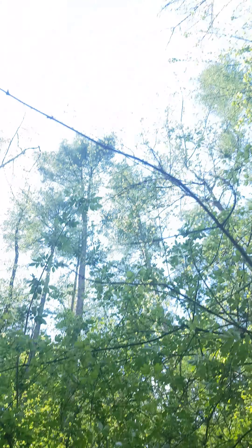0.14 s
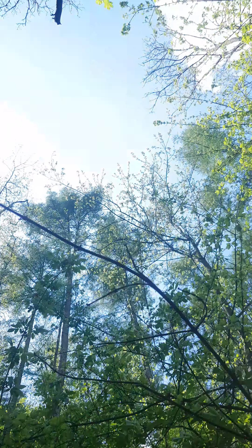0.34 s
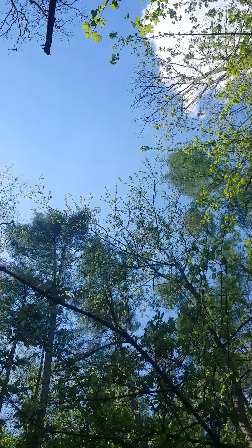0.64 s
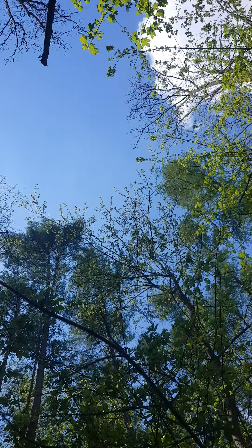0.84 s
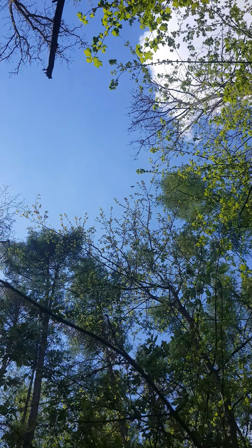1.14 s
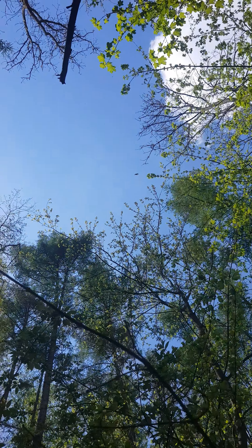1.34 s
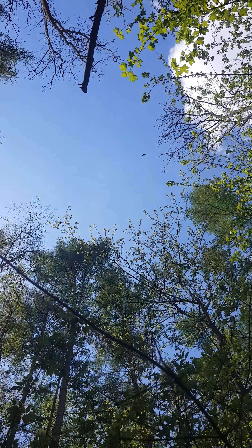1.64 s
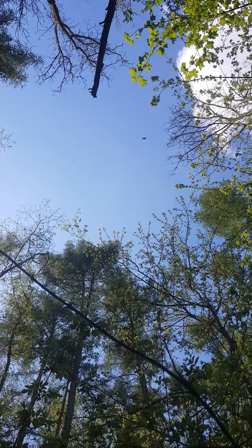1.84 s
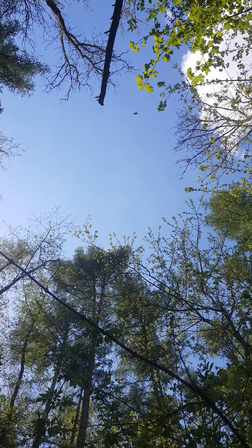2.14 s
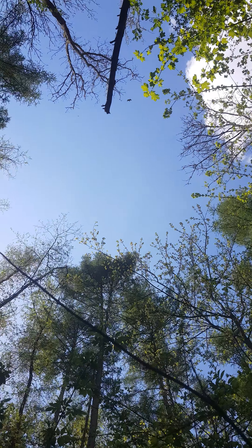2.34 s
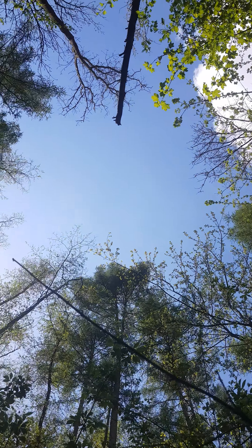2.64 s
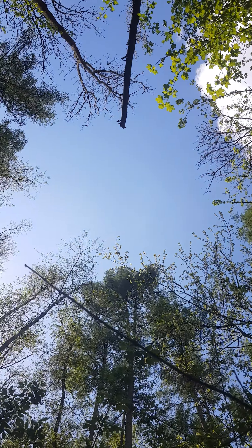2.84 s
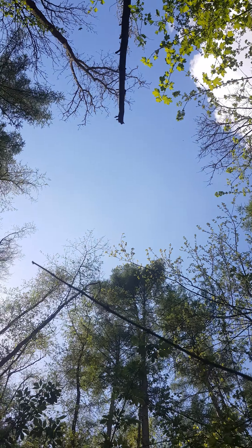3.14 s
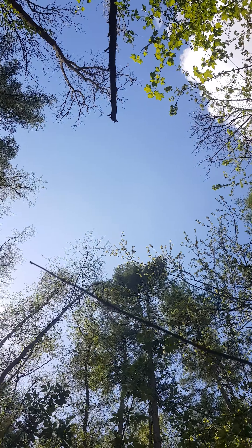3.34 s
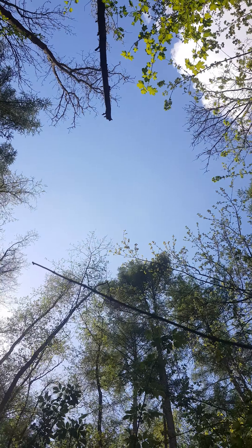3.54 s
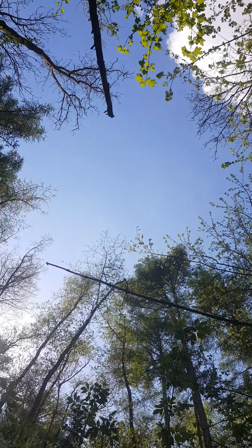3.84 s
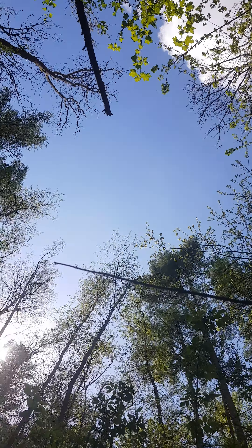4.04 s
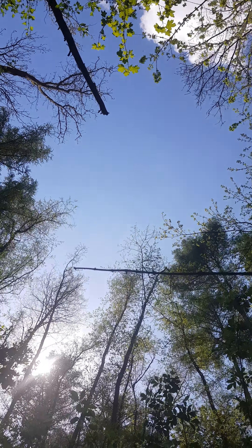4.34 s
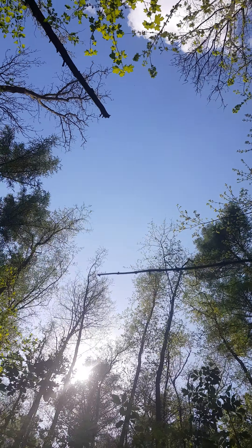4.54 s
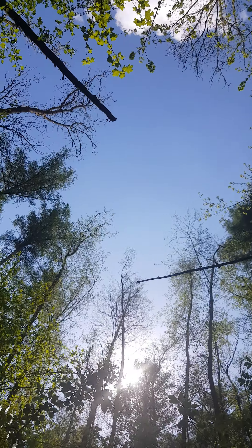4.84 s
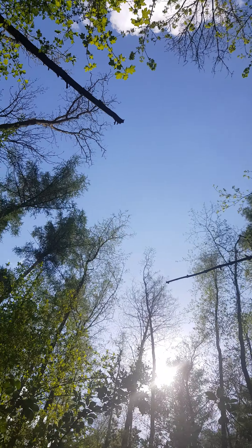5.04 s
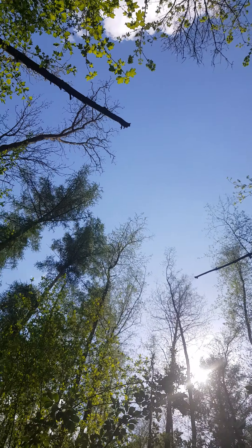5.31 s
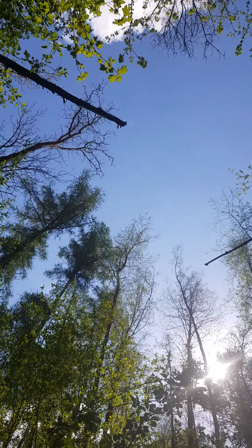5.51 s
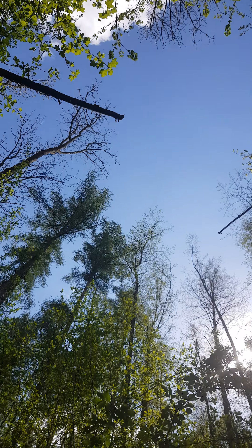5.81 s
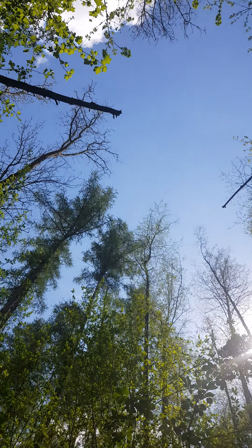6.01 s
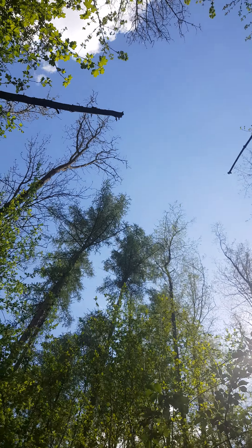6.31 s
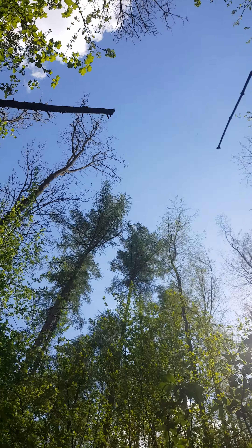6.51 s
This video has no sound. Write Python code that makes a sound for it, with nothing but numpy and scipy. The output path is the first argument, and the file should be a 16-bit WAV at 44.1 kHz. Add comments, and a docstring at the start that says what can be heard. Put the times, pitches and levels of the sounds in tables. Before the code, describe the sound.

A soft low bump and cloth rustle open the scene, then distant birds of prey cry overhead, plaintive and falling, slightly left, with diffuse forest echo. A far songbird sings a quick run of whistled and buzzy notes between the cries. Wind rumbles unevenly on the handheld microphone, and light ticks and sleeve strokes gather towards the end over a quiet hush.

```python
"""A woodland clearing: buzzards mew high overhead, and the trees echo them.
Each cry is a harmonic voice whose pitch arches up and slides down; rasps are narrow noise bands.
A far songbird sings tone sweeps, mostly echo. A sleeve rustles and ticks on the hand-held camera
(shaped noise), which jolts softly (short low tones). Air rumbles on the microphone over the hush
of the wood: two coloured noises."""
import sys
import numpy as np
from scipy import signal
from scipy.fft import rfft, irfft, next_fast_len
from scipy.io import wavfile
from scipy.ndimage import map_coordinates

SR = 44100
rng = np.random.default_rng(int(sys.argv[2]) if len(sys.argv) > 2 else 0)


def waveform_to_disk(signal):
    """Save audio, clipped to [-1, 1], as 16-bit WAV at the path in sys.argv[1]."""
    frames = np.transpose(np.atleast_2d(signal))
    scaled = np.clip(frames, -1, 1) * 32767
    samples = np.round(scaled).astype(np.int16)
    wavfile.write(sys.argv[1], SR, samples)


N = 293962
TIME = np.arange(N) / SR


def amp(db):
    """Decibels to gain."""
    return 10 ** (np.asarray(db) / 20)


def unit(x):
    """x at rms 1."""
    return x / np.sqrt(np.mean(np.abs(x) ** 2) + 1e-20)


def along(points, hz):
    """(frequency [Hz], value) points read on a log frequency axis."""
    f, v = np.transpose(points)
    return np.interp(np.log(hz + 1), np.log(f + 1), v)


def curve(points):
    """(time [s], value) points read at every sample."""
    s, v = np.transpose(points)
    return np.interp(TIME, s, v)


def wobble(rate_hz, size=N):
    """Smooth random curve, rate_hz knots per second."""
    knots = rng.standard_normal(int(size * rate_hz / SR) + 4)
    return map_coordinates(knots, [np.arange(size) * rate_hz / SR])


def filtered(x, response):
    """x times a zero-phase gain response(hz)."""
    m = next_fast_len(N + 8192)
    gain = response(np.fft.rfftfreq(m, 1 / SR))
    return irfft(rfft(x, m) * gain, m)[..., :N]


def add(track, s, sound):
    """Mix a sound into a track from time s on."""
    start = max(round(s * SR), 0)
    part = sound[..., :N - start]
    track[..., start:start + part.shape[-1]] += part


def panned(db):
    """Left and right gains for a level difference."""
    return amp([[db / 2], [-db / 2]])


def rush(spectrum, alike):
    """Stereo noise, rms 1, of given colour and left-right correlation."""
    def response(hz):
        turn = np.arccos(np.clip(along(alike, hz), -1, 1)) / 2
        return amp(along(spectrum, hz)) * [np.cos(turn), np.sin(turn)]

    mid, side = filtered(rng.standard_normal((2, N)), response)
    return unit(np.array([mid + side, mid - side]))


# buzzard cries; pitches are of the loud second harmonic:
# (time [s], length [s], start [Hz], crest [Hz], settling pitch [Hz], rise [s], slide [s], swell [s],
#  peak level [dB], fade [dB/s], overtones [dB], hoarseness [dB], echo send [dB], left-right [dB],
#  left lead [s])
CRIES = [(0.484, .55, 2150, 2398, 1860, 0.063, 0.1, 0.016, -58.5, 35, -23, -10, -1.5, -7, .00038),
         (0.889, 0.26, 2850, 2783, 1888, 0.011, 0.13, 0.14, -64.5, 48, -30, -12, 1.5, -5, 0.00042),
         (1.583, 0.16, 2204, 2772, 1876, .069, 0.099, 0.0041, -46, 45, -12.5, -19, -5.5, -3, 0.000065),
         (1.624, 0.51, 1830, 2311, 1775, 0.094, 0.14, 0.16, -37, 80, -25, -29, -14.5, -2.5, 0.000088),
         (1.957, .23, 2480, 2485, 1815, .01, .145, 0.097, -55.5, 37, -26, -5.5, -7, -4, .00009),
         (2.51, 0.59, 2030, 2442, 1830, 0.041, .11, 0.025, -53, 37, -21.5, -16, -5.5, -6.5, 0.00044),
         (2.802, 0.35, 2894, 2840, 2034, .115, .068, 0.22, -58.5, 51, -35, -12, -10, -2, 0.00047),
         (4.01, 0.24, 2162, 2416, 1840, 0.045, 0.083, 0.023, -53, 73, -22, -15, -1.5, -5.5, .00046),
         (4.257, 0.27, 2746, 2780, 1888, 0.0087, 0.084, 0.069, -62, -8, -28, -13, 0, -2, 0.00047),
         (4.369, .16, 2830, 2920, 1920, 0.012, 0.18, 0.044, -68, 25, -18, -25, -11, -3, 0.0004),
         (4.475, 0.54, 1930, 2255, 1814, .075, .124, 0.054, -43.5, 43.5, -21, -27, -9.5, -5.5, 0.00014),
         (5.427, 0.31, 2380, 2600, 1683, 0.053, .11, 0.12, -61.5, 36, -25, -7, 0.5, -4, 0.00029),
         (5.49, 0.17, 2232, 2390, 2204, 0.055, .06, .05, -58, 78, -33, -12, -13, -5.5, 0.00033),
         (5.727, 0.26, 2740, 2740, 1945, 0.00515, .093, 0.085, -66.5, 40, -37, -11, 2, -7, 0.00032)]
# harsh rasps: (time [s], length [s], centre [Hz], width as standard deviation [Hz], level [dB])
RASP_BANDS = [(.5, 0.15, 2590, 180, -63.5), (2.54, 0.11, 2630, 160, -58.5), (4.05, 0.074, 2710, 150, -62.5),
              (4.01, 0.19, 3350, 280, -65.5), (4.04, 0.17, 3680, 100, -65.5)]
GROUND_S, GROUND_DB = 0.0105, -16.5


def buzzards(slap_s=0.075, slap_db=-11):
    """Cries reach the left port first; cries and rasps then return from ground and trees."""
    direct, sent = np.zeros((2, N)), np.zeros(N)
    for (s, length_s, start_hz, crest_hz, settle_hz, rise_s, slide_s, swell_s, peak_db, fade_db_per_s,
         overtone_db, hoarse_db, echo_db, side_db, lead_s) in CRIES:
        t = np.arange(int(length_s * SR)) / SR
        glide_hz = mew_pitch(t, start_hz, crest_hz, settle_hz, rise_s, slide_s)
        level_db = mew_level(t, swell_s, peak_db, fade_db_per_s)
        cry = mew(t, glide_hz, level_db, overtone_db, hoarse_db)
        left, right = cry * panned(side_db)
        add(direct[0], s, left)
        add(direct[1], s + lead_s, right)
        add(sent, s, cry * amp(echo_db))
    for s, length_s, centre_hz, width_hz, db in RASP_BANDS:
        swell = signal.windows.tukey(int(length_s * SR), 0.7)
        band = lambda hz: np.exp(-((hz - centre_hz) / width_hz) ** 2 / 2)
        harsh = unit(filtered(rng.standard_normal(N), band))
        rasp = amp(db) * swell * harsh[:len(swell)]
        add(direct, s, rasp)
        add(sent, s, rasp)
    # ground bounce beats against each glide and cuts dips into it
    add(direct, GROUND_S, amp(GROUND_DB) * direct)
    direct += near_trunks(direct, db=-6.5, reach_s=0.03)
    # foliage dulls the overtones; the clearing's edge gives one distinct return
    foliage_db = [(2500, 2.5), (3200, -0.5), (5000, -1)]
    sent = filtered(sent, lambda hz: amp(along(foliage_db, hz)))
    add(direct, slap_s, amp(slap_db) * sent)
    return direct + woodland(sent, build_up_s=0.0085) * panned(-0.26)


DROOP_SHARE, DROOP_S = 0.07, 0.026


def mew_pitch(t, start_hz, crest_hz, settle_hz, rise_s, slide_s):
    """Pitch scoops to a crest, slides towards a settling pitch and droops at the very end."""
    scoop = (crest_hz - start_hz) * np.maximum(1 - t / rise_s, 0) ** 2
    after_crest = np.maximum(t - rise_s, 0) / slide_s
    slide = (crest_hz - settle_hz) * (1 - 1 / (1 + after_crest ** 2))
    droop = 1 - DROOP_SHARE * np.exp((t - t[-1]) / DROOP_S)
    return (crest_hz - scoop - slide) * droop


SWELL_DB = 16.5  # a cry starts this far under its peak


def mew_level(t, swell_s, peak_db, fade_db_per_s):
    """Level swells to a peak, then changes steadily (a negative fade grows)."""
    swell_db = SWELL_DB * np.maximum(1 - t / swell_s, 0) ** 2
    return peak_db - swell_db - fade_db_per_s * np.maximum(t - swell_s, 0)


# overtone colour: (frequency [Hz], gain [dB])
THROAT_COLOUR = [(900, -9), (1400, 3), (2200, -17), (3300, 3), (3800, -10.5), (4200, -0.5), (4650, -9),
                 (5050, -7), (5500, -13), (7000, -31)]
SHRILL_DB = 4  # top partials against the lower overtones


def mew(t, hz, db, overtone_db, hoarse_db, waver=0.0034, flutter_db=2.5, edge_s=0.0049, shrill_s=0.255,
        shrill_width_s=0.075, bloom_s=0.023, rough_rad=0.15, shimmer_db=3):
    """One cry: harmonic voice whose second partial carries nearly all the power."""
    size = len(t)
    pitch_hz = hz / 2 * (1 + waver * wobble(90, size))
    phase = 2 * np.pi * np.cumsum(pitch_hz) / SR
    # partials 4 and 5 open around shrill_s into the cry
    shrill = amp(SHRILL_DB) * (0.055 + np.exp(-((t - shrill_s) / shrill_width_s) ** 2))
    # overtones bloom after the attack, with jitter of their own
    bloom = 1 - np.exp(-(t / bloom_s) ** 2)
    jitter = rough_rad * wobble(350, size)
    voice = np.sin(2 * phase)
    for k, opening in ((1, 1), (3, 1), (4, shrill), (5, shrill)):
        partial_db = overtone_db + along(THROAT_COLOUR, k * pitch_hz) + shimmer_db * wobble(80, size)
        voice += bloom * opening * amp(partial_db) * np.sin(k * (phase + jitter))
    # uneven vibration spreads a hoarse skirt around the line
    skirt = wobble(600, size) * np.sin(2 * phase) + wobble(600, size) * np.cos(2 * phase)
    voice += amp(hoarse_db) * skirt
    gate = np.clip(np.minimum(t, t[-1] - t) / edge_s, 0, 1)
    # turbulent air makes the far voice flutter
    return np.sqrt(2) * voice * gate * amp(db + flutter_db * wobble(107.9, size))


def near_trunks(pair, db, reach_s, count=8):
    """Weak early returns, different at each port, beat against a gliding tone."""
    returns = np.zeros((2, N))
    for port, x in zip(returns, pair):
        for delay_s in rng.uniform(0.0044, reach_s, count):
            add(port, delay_s, amp(db) / np.sqrt(count) * x)
    return returns


# echo of the wood: (frequency [Hz], time to decay 60 dB [s])
TREE_T60 = [(300, 0.92), (2200, 1.48), (4500, 0.42), (10000, 0.6)]


def woodland(x, build_up_s):
    """Trunks and crowns scatter a sound into a diffuse tail that takes a moment to build."""
    hz, t, z = signal.stft(rng.standard_normal((2, SR)), SR, nperseg=256)
    decay = amp(-60 * t / along(TREE_T60, hz)[:, None])
    shape = decay * (1 - np.exp(-t / build_up_s))
    # equal tail energy in every band; 128 = hop in samples
    shape /= np.sqrt(np.sum(shape ** 2, axis=1, keepdims=True) * 128)
    tail = signal.istft(z * shape, SR, nperseg=256)[1]
    return signal.fftconvolve(x[None], tail, axes=1)[:, :N]


# repeated notes: (first time [s], notes [count], spacing [s], length [s], start [Hz], end [Hz],
#  level of the last before direct and echo gains [dB], buzz [share of pitch], crescendo [dB/note])
NOTE_RUNS = [(2.41, 4, 0.17, .028, 4520, 4280, -67.5, .014, 3.5),
             (2.61, 3, 0.18, 0.042, 4830, 4460, -75, 0.037, 1),
             (2.687, 2, .19, 0.043, 6870, 5750, -85, 0.063, 2.5),
             (3.031, 6, 0.072, 0.044, 4520, 2920, -68.5, 0.048, 0.8)]
# closing flourish, then thin contact calls: (time [s], length [s], start [Hz], end [Hz],
#  level before direct and echo gains [dB], buzz [share of pitch])
SINGLE_NOTES = [(3.475, 0.031, 3180, 4430, -69, 0.05), (3.527, 0.043, 3180, 2220, -66.5, 0.077),
                (3.656, 0.061, 2305, 3100, -71, .058), (3.781, 0.05, 5370, 4470, -78, 0.069),
                (3.851, .041, 5230, 3600, -75, 0.091), (4.8, .06, 7600, 7240, -89, 0.035),
                (5.655, 0.078, 7500, 7180, -77.5, 0.027), (6.175, 0.082, 7480, 7150, -80, .03)]


def songbird():
    """Whistled and buzzy sweeps; repeated notes grow louder within each run; far off, mostly echo."""
    notes = []
    for s, count, spacing_s, length_s, start_hz, end_hz, last_db, buzz, crescendo_db in NOTE_RUNS:
        for k in range(round(count)):
            db = last_db - crescendo_db * (round(count) - 1 - k)
            notes.append((s + k * spacing_s, length_s, start_hz, end_hz, db, buzz))
    song = np.zeros(N)
    for s, length_s, start_hz, end_hz, db, buzz in [*notes, *SINGLE_NOTES]:
        size = int(length_s * SR)
        hz = np.geomspace(start_hz, end_hz, size) * (1 + buzz * wobble(1140, size))
        whistle = np.sin(2 * np.pi * np.cumsum(hz) / SR)
        add(song, s, amp(db) * signal.windows.tukey(size, 0.4) * whistle)
    return amp(2) * song + amp(8) * woodland(song, build_up_s=0.0027)


# camera jolts: (time [s], frequency [Hz], level before panning [dB])
JOLTS = [(0.086, 53.4, -39.5), (0.213, 62.5, -31.5), (5.873, 52, -42)]
# sleeve strokes: (peak time [s], half length to 1/e [s], level before panning [dB])
SLEEVE_STROKES = [(0.206, 0.2, -64), (0.44, 0.6, -76), (5.524, 0.054, -59), (5.871, 0.056, -63),
                  (5.981, 0.038, -66), (6.054, 0.75, -75), (6.118, 0.078, -72), (6.433, 0.08, -62)]
# cloth colour: (frequency [Hz], relative density [dB per Hz])
CLOTH_COLOUR = [(1500, 4.5), (3500, -8.5), (5000, -6.5), (6500, -1), (8500, -8), (11000, -9.5), (13500, -6),
                (15500, -18)]
# handling ticks: (time [s], level before trim [dB], left-right [dB])
HANDLING_TICKS = [(1.3486, -58, -5), (1.6008, -52.5, -1), (1.8524, -58.5, -1.5), (4.6384, -68, 15),
                  (5.4237, -67, -22), (5.456, -50.5, -4), (5.5975, -52, -9), (5.636, -69, 5),
                  (5.761, -60, -5.5), (5.9209, -57, -16), (6.103, -57.5, -11), (6.3705, -49.5, 2)]


def handling(grain_db=1.0, tick_t60_s=0.021, bump_s=0.016):
    """Soft jolts as low tone bursts; sleeve strokes and ticks as enveloped noise."""
    jolts = sum(amp(db) * np.exp(-((TIME - s) / bump_s) ** 2) * np.sin(2 * np.pi * hz * (TIME - s))
                for s, hz, db in JOLTS)
    stroke = sum(amp(db) * np.exp(-((TIME - s) / half_s) ** 2) for s, half_s, db in SLEEVE_STROKES)
    grain = amp(grain_db * wobble(700) + 1.6 * wobble(40))
    fibres = unit(rush(CLOTH_COLOUR, [(1000, 0.013)]) * grain)
    ticks, t = np.zeros((2, N)), np.arange(SR // 8) / SR
    # fast decay plus a slower tail
    fade = amp(-60 * t / tick_t60_s) + amp(-2.5 - 60 * t / 0.46)
    for s, db, side_db in HANDLING_TICKS:
        add(ticks, s, amp(db - 9.5) * fade * panned(side_db))
    tick_noise = rush(CLOTH_COLOUR, [(1000, 0.0026)])
    return jolts * panned(-23) + stroke * fibres * panned(-8.5) + ticks * tick_noise


# air on the microphone: (time [s], level before BUFFET_DB [dB])
BUFFET_LEVEL = [(0.26, -41.5), (0.28, -46.5), (0.49, -47.5), (0.6, -61), (0.92, -48), (1.01, -59.5),
                (2.2, -51.5), (2.27, -57), (2.9, -51), (3.42, -54.5), (3.56, -47), (3.76, -66), (3.95, -49),
                (3.99, -55), (4.27, -47.5), (4.36, -63.5), (4.49, -52.5), (4.74, -58), (5.36, -53),
                (5.54, -68), (5.59, -55.5), (5.81, -54.5), (5.84, -49.5), (6.67, -63)]
# its balance: (time [s], left-right [dB])
BUFFET_BALANCE = [(.3, -6), (.9, -2.5), (5.45, -1.5), (6.05, -10), (6.67, -4.5)]
# its colour: (frequency [Hz], relative density [dB per Hz])
RUMBLE_COLOUR = [(13, -48.5), (24, -28), (47, -1), (65, 3), (78, 0), (100, -5.5), (162, -19), (220, -18),
                 (290, -39), (480, -120)]
BUFFET_DB, EDDY_DB, EDDY_HZ = 1, 1.5, 9  # overall gain; eddy depth and knot rate


def buffeting():
    """Air rumbles on the microphone, with its own eddies at each port."""
    eddies_db = EDDY_DB * np.array([wobble(EDDY_HZ), wobble(EDDY_HZ)])
    side_db = curve(BUFFET_BALANCE)
    level_db = BUFFET_DB + curve(BUFFET_LEVEL) + eddies_db + np.array([side_db, -side_db]) / 2
    return amp(level_db) * rush(RUMBLE_COLOUR, [(30, 0.8), (120, 0.95)])


# the wood and the microphone's hiss: (frequency [Hz], relative density [dB per Hz])
HUSH_COLOUR = [(76, -38), (130, -1), (179, -7.5), (284, -5.5), (391, -5.5), (487, -8), (835, -6.5),
               (1680, -15), (2010, -18.5), (2320, -17.5), (2950, -32.5), (7390, -44), (8340, -52),
               (12000, -36.5), (15500, -37)]
# its level before drift and panning: (time [s], level [dB])
HUSH_FADE = [(0, -56), (3, -56), (6.67, -58)]
# its stereo likeness: (frequency [Hz], left-right correlation [-1 to 1])
HUSH_LIKENESS = [(160, 0.83), (270, 0.89), (450, 0.68), (740, 0.12), (1220, -0.14), (2000, -0.18),
                 (5000, -0.0064)]


def hush():
    """The wood and the microphone's hiss: one coloured noise, gently drifting in level."""
    level_db = curve(HUSH_FADE) + 0.59 * wobble(7.7)
    return amp(level_db) * rush(HUSH_COLOUR, HUSH_LIKENESS) * panned(-1.2)


def scene():
    """Birds, the hand on the camera, air and wood."""
    return buzzards() + songbird() + handling() + buffeting() + hush()


TOP_HZ = 15720


def record(dry):
    """The camera keeps nothing above its band limit."""
    return filtered(dry, lambda hz: hz < TOP_HZ)


dry = scene()
out = record(dry)
waveform_to_disk(out)
```